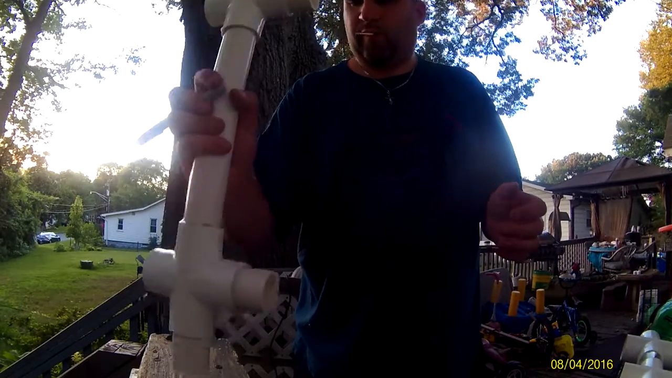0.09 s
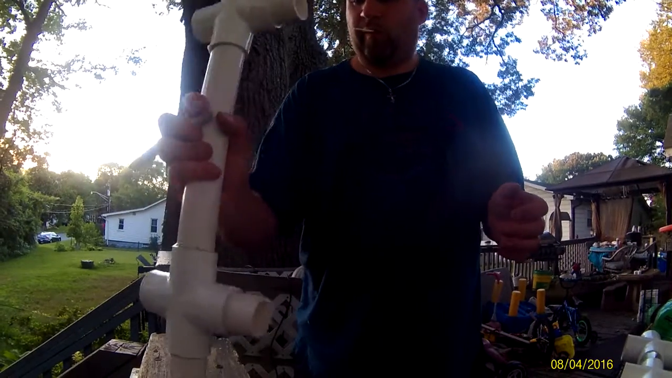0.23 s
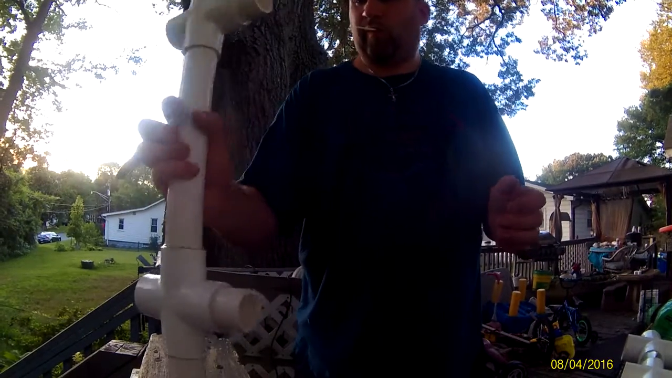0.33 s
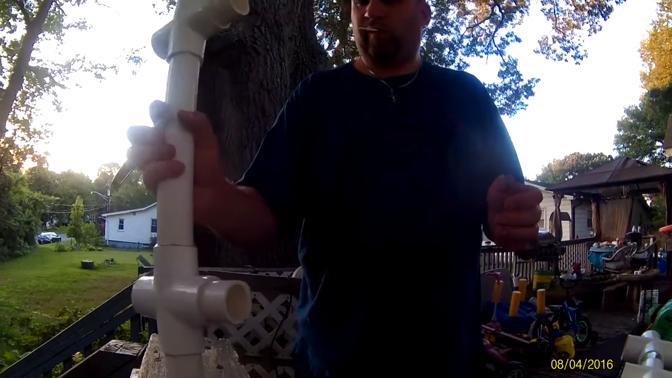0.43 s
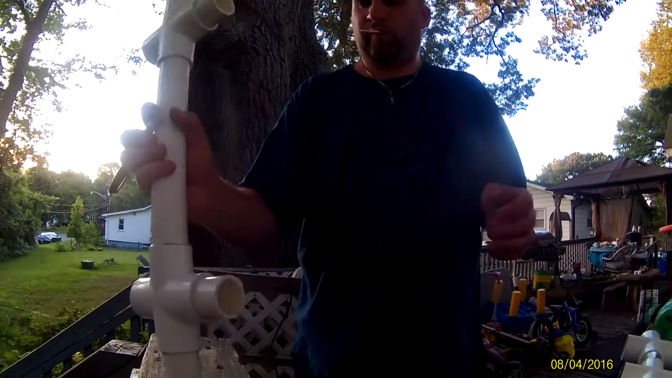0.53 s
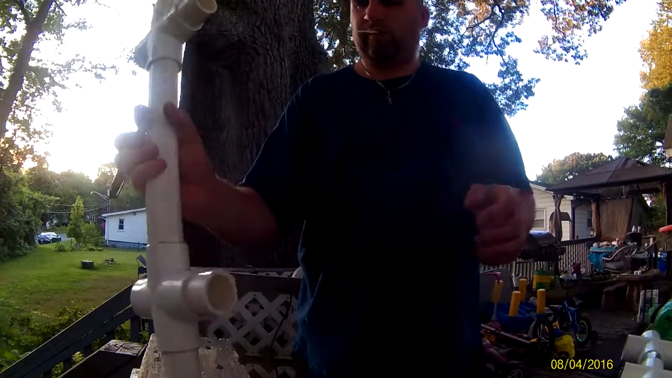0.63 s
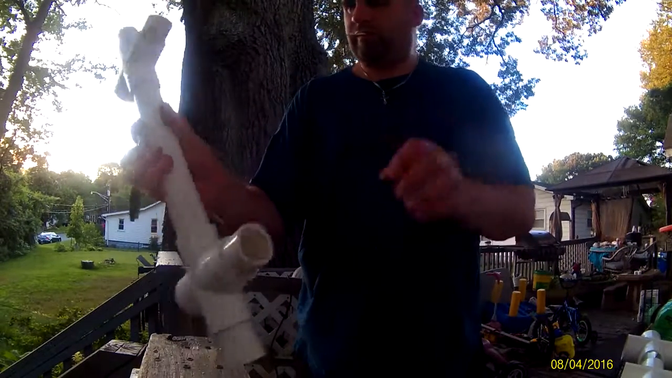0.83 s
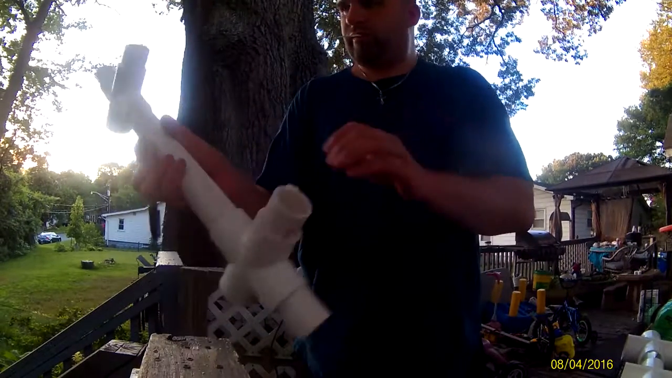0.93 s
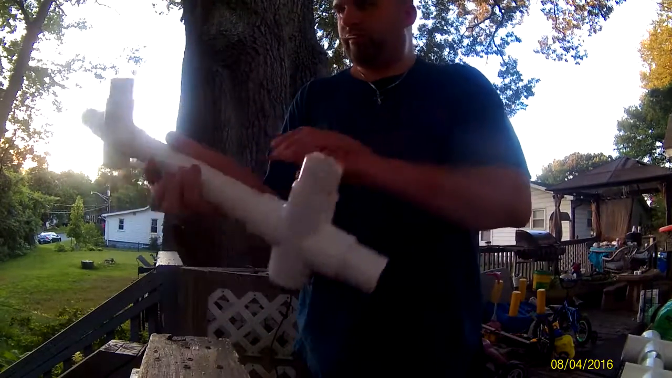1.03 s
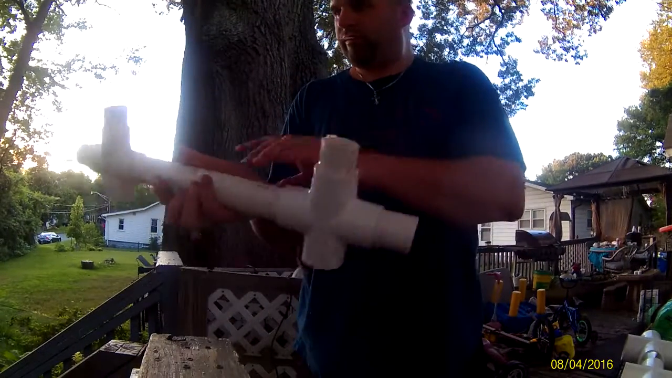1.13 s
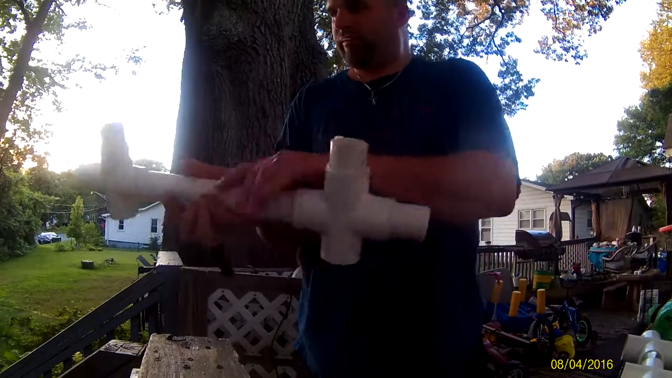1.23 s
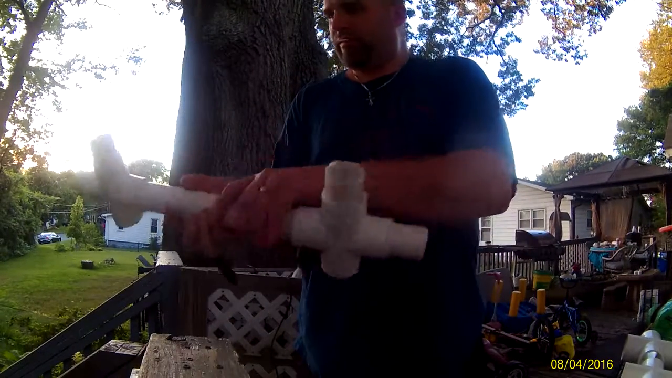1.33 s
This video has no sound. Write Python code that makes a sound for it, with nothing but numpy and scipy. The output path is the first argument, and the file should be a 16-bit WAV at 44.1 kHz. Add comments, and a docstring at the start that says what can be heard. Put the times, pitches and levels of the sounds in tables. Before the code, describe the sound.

A plastic pipe frame knocks down hard on a wooden stand, one loud hollow clack outdoors

```python
"""A frame of plastic pipe is knocked down once on a wooden work stand, outdoors: one loud hollow blow.
The pipe and boards ring as fading sine waves with bursts of noise, and the blow overloads the input.
Fittings chatter as short bright noise ticks while the pipe bounces to rest on the boards.
Something loose, probably metal, rings on faintly as slow-fading sines. Behind it lie a weak noise echo,
quiet yard air made of coloured noise, and a thin electronic whine made of narrow hiss and a high tone."""
import sys
import numpy as np
from scipy import signal
from scipy.fft import rfft, irfft
from scipy.io import wavfile

SR = 44100
rng = np.random.default_rng(int(sys.argv[2]) if len(sys.argv) > 2 else 0)


def to_wav(s):
    """Save 16-bit WAV."""
    ch = np.atleast_2d(s).T  # columns
    pcm = np.round(np.clip(ch, -1, 1) * 32767)  # PCM
    wavfile.write(sys.argv[1], SR, pcm.astype(np.int16))


N = 59535


def amp(db):
    """Turns decibels into a plain multiplier."""
    return 10 ** (np.asarray(db) / 20)


def unit(x):
    """Scales a sound to an average (rms) strength of 1."""
    return x / np.sqrt(np.mean(x ** 2) + 1e-20)


def read(points, hz):
    """Reads a table between its points, along a logarithmic frequency axis."""
    point_hz, value = np.transpose(points)
    return np.interp(np.log(hz + 1), np.log(point_hz + 1), value)


def add(mix, start_s, sound):
    """Mixes a sound in at a time in seconds, which may lie before the start of the scene."""
    at = round(start_s * SR)
    sound = sound[max(-at, 0):]
    part = mix[max(at, 0):][:len(sound)]
    part += sound[:len(part)]


def axes():
    """Gives the times (s) and frequencies (Hz) of the whole scene."""
    return np.arange(N) / SR, np.fft.rfftfreq(N, 1 / SR)


def noise(gain):
    """Makes noise of rms 1, coloured by a gain for each frequency."""
    white = rng.standard_normal(N)
    return unit(irfft(rfft(white) * gain, N))


def die_away(x, t60s):
    """Splits a sound into overlapping bands and fades each by 60 dB in its own time (t60)."""
    t, hz = axes()
    spectrum = rfft(x)
    centres = [centre for centre, _ in t60s]
    total = np.zeros(N)
    # Each band weighs 1 at its own centre and slopes to 0 at its neighbours.
    for weights, (_, t60) in zip(np.eye(len(t60s)), t60s):
        band_gain = read(list(zip(centres, weights)), hz)
        total += irfft(spectrum * band_gain, N) * amp(-60 * t / t60)
    return total


def ring(modes):
    """A struck object vibrates at several frequencies (modes): each is a sine that dies away."""
    t, _ = axes()
    total = np.zeros(N)
    for hz, db, t60 in modes:
        fade = np.exp(-np.log(1000) * t / t60)  # down 60 dB after t60
        total += amp(db) * fade * np.sin(2 * np.pi * hz * t)
    return total


def knocks():
    """The blow rings the hollow pipe; the lighter bounces ring the boards, which radiate little bass."""
    # Hollow pipe. Each row: frequency in Hz, relative level in dB, t60 in s.
    pipe_modes = [(139.4, -39.5, .22), (299.8, -2.5, .043), (422.6, -6, .036), (545.3, 8, .026),
                  (592.6, -4, .053), (723, -3, .038), (957, -29, .1), (1158, -17, 0.062),
                  (1240.2, -7.5, .035), (1371, -6, .036), (1508, -17, .046), (1590, 17, .006),
                  (2080, -8.5, .026), (3076, -10.5, .025)]
    # Boards of the stand. Each row: frequency in Hz, relative level in dB, t60 in s.
    board_modes = [(342, -7, .056), (455, -9.5, .18), (674, -11.5, .087), (731, -2, .035),
                   (808, -7.5, 0.031), (904, 0.24, .025), (1057, -13, .038), (1250, -8.5, .046),
                   (1368, -12.5, .045), (1500, -12.5, .046), (2380, -29, .052)]
    # The blow, in quick successive contacts. Each row: start in s, pipe level in dB, clatter level in dB.
    blows = [(.2278, 13.5, -22), (.23038, 0.5, -20), (0.2454, -17.5, -26.5)]
    # Bounces on the boards. Each row: start in s, boards level in dB, brightness in dB per octave,
    # clatter level in dB.
    bounces = [(.26252, -18, -6, -34), (.28596, -11, 0.4, -29.5), (.2981, -18, -2.5, -25),
               (.32187, -31, -3, -49.5), (0.3359, -27.5, 0.5, -38), (.366, -52, -11, -65)]
    contact_s = .0005  # how gently each contact sets in
    boards_low_hz, boards_mid_hz = 220, 685  # bass cut; pivot of the brightness tilt

    t, _ = axes()
    out = np.zeros(N)
    contact = 1 - np.exp(-t / contact_s)
    pipe = ring(pipe_modes)
    for start_s, pipe_db, clatter_db in blows:
        blow = amp(pipe_db) * pipe + amp(clatter_db) * clatter()
        add(out, start_s, contact * blow)

    low_cut = signal.butter(4, boards_low_hz, "highpass", fs=SR, output="sos")
    for start_s, boards_db, bright_db, clatter_db in bounces:
        tilted_modes = [(hz, mode_db + bright_db * np.log2(hz / boards_mid_hz), t60)
                        for hz, mode_db, t60 in board_modes]
        boards = signal.sosfilt(low_cut, contact * ring(tilted_modes))
        add(out, start_s, amp(boards_db) * boards + amp(clatter_db) * contact * clatter())
    return out


def clatter():
    """Pipe and wood together have dense short modes, heard as a noise burst, new at every contact."""
    # Colour of the burst. Each row: frequency in Hz, relative level in dB per Hz.
    colour = [(40, -30), (200, -12), (400, 0.5), (900, 0), (1100, -3.5), (1550, 3), (1950, -13.5),
              (3000, -20.5), (6000, -41), (15000, -57)]
    # How fast it fades. Each row: frequency in Hz, t60 in s.
    fade_times = [(100, 0.043), (500, 0.063), (1500, 0.069), (4000, 0.016), (12000, .02)]
    _, hz = axes()
    return die_away(noise(amp(read(colour, hz))), fade_times)


def chatter():
    """Fittings chatter in their sockets: brief bright clacks of plastic on plastic, made from noise."""
    # Clacks. Each row: start in s, level in dB.
    ticks = [(.2315, -6), (.2367, -18.5), (.2415, -15), (.2452, -12), (.248, -24), (.2505, -28),
             (.2555, -31), (.2592, -28.5), (.265, -43.5), (.2772, -27.5), (0.2857, -30.5), (.2945, -35.5),
             (.2985, -40), (.302, -40)]
    # Colour of a clack. Each row: frequency in Hz, relative level in dB per Hz.
    tick_colour = [(1500, -20), (2400, -6), (3600, -9), (4500, -1.5), (5100, 3.5), (5750, -12.5),
                   (6400, -4.5), (7400, -15), (8200, -3.5), (9150, -27), (10200, -10), (12500, -27),
                   (16000, -33)]
    rise_s, t60_s = 0.00046, .009

    t, hz = axes()
    out = np.zeros(N)
    shape = np.minimum(t / rise_s, 1) * np.exp(-np.log(1000) * t / t60_s)
    gain = amp(read(tick_colour, hz))
    for start_s, db in ticks:
        add(out, start_s, amp(db) * shape * noise(gain))
    return out


def metal():
    """Loose metal gives a faint clear ring, still fading at first and then set off anew by the blow."""
    # Modes. Each row: frequency in Hz, relative level in dB, t60 in s.
    metal_modes = [(453, -11, .8), (642, 0, .58), (1335, -1, .44)]
    # Rings. Each row: start in s, level in dB, extra level of the top mode in dB.
    rings = [(-.06, -35.5, -13), (.229, -31, -2.5)]
    out = np.zeros(N)
    for start_s, db, overtone_db in rings:
        lower_modes = ring(metal_modes[:-1])
        top_mode = amp(overtone_db) * ring(metal_modes[-1:])
        add(out, start_s, amp(db) * (lower_modes + top_mode))
    return out


def yard(x):
    """Deck and trees scatter the knocks back weakly and dully, as a fading tail of noise."""
    # Colour of the echo. Each row: frequency in Hz, gain in dB.
    echo_colour = [(50, -42), (150, -36), (300, -42), (700, -48), (1300, -54), (3000, -58), (10000, -62)]
    # How fast it fades. Each row: frequency in Hz, t60 in s.
    echo_fade = [(60, .6), (400, 0.39), (1500, .42), (4000, .2), (12000, .12)]
    t, hz = axes()
    tail = die_away(rng.standard_normal(N), echo_fade)
    tail *= np.minimum(t / .015, 1)  # builds up over 15 ms
    tail /= np.linalg.norm(tail)
    tail = irfft(rfft(tail) * amp(read(echo_colour, hz)), N)
    return signal.fftconvolve(x, tail[:N // 2])[:N]


def background():
    """Still outdoor air is steady coloured noise; the deck's shudder is low noise that swells and fades."""
    # Colour of the air. Each row: frequency in Hz, relative level in dB per Hz.
    air_colour = [(15, 0), (40, -0.5), (90, 1), (150, -3), (245, -3), (380, -9.5), (620, -11.5),
                  (900, -14.5), (2000, -22), (4500, -28.5), (9000, -30), (15700, -27.5)]
    air_db = -57.5
    # The deck shudders after the blow: level, top of its range, time of its peak, spread in time.
    rumble_db, rumble_hz, rumble_s, rumble_length_s = -56, 32, .45, .22

    t, hz = axes()
    air = amp(air_db) * noise(amp(read(air_colour, hz)))
    shudder = noise(1 / (1 + (hz / rumble_hz) ** 4))
    shudder *= np.exp(-((t - rumble_s) / rumble_length_s) ** 2)
    return air + amp(rumble_db) * shudder


def whine():
    """The electronics add narrow bands of hiss and a thin high tone that keeps flipping its polarity."""
    # Hiss bands. Each row: centre in Hz, width in Hz, level in dB.
    hiss_bands = [(5850, 700, -78), (6720, 450, -70.5)]
    swell_db, swell_period_s, swell_top_s = 1.7, 0.27, 0.2  # the hiss swells slowly
    whistle_hz, whistle_db = 13364, -73
    flip_hz = 40.5  # there-and-back flips per second

    t, hz = axes()
    hiss = np.zeros(N)
    for centre, width, db in hiss_bands:
        hiss += amp(db) * noise(1 / (1 + (2 * (hz - centre) / width) ** 2))
    swell = amp(swell_db * np.cos(2 * np.pi * (t - swell_top_s) / swell_period_s))
    flips = np.tanh(10 * np.sin(2 * np.pi * flip_hz * t))  # nearly a square wave
    whistle = unit(flips * np.sin(2 * np.pi * whistle_hz * t))
    return swell * hiss + amp(whistle_db) * whistle


def scene():
    """Adds up everything that reaches the microphone."""
    hits = knocks() + chatter()
    return (hits + yard(hits) + metal() + background())[None]


def record(dry):
    """The input clips hard, softens the lowest and highest tones and adds its whine; then a treble limit."""
    clip_level = .69  # full scale is 1
    low_cut_hz, soft_top_hz = 6.3, 12100
    edge_hz = 15850  # sharp upper limit

    clipped = np.clip(dry, -clip_level, clip_level)
    b, a = signal.butter(1, [low_cut_hz, soft_top_hz], "bandpass", fs=SR)
    with_whine = signal.lfilter(b, a, clipped) + whine()
    band_limit = signal.firwin(511, edge_hz, window=("kaiser", 9), fs=SR)
    return signal.oaconvolve(with_whine, band_limit[None], "same")


dry = scene()
out = record(dry)
to_wav(out)
```